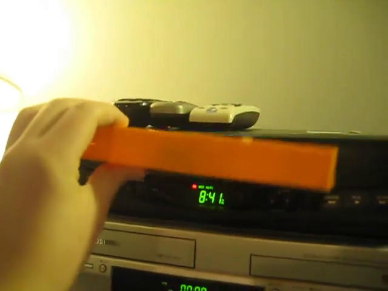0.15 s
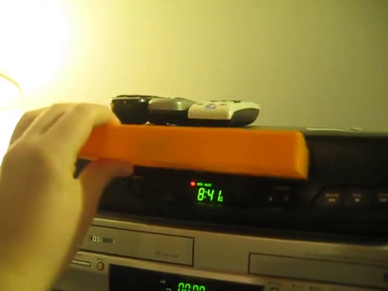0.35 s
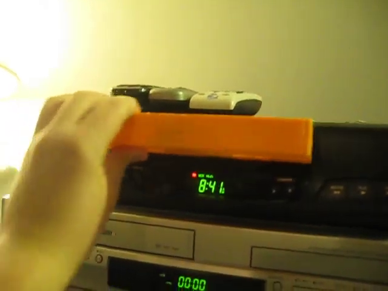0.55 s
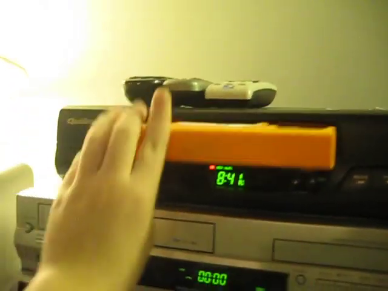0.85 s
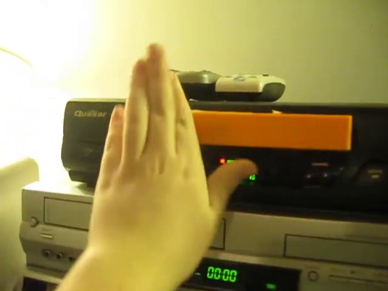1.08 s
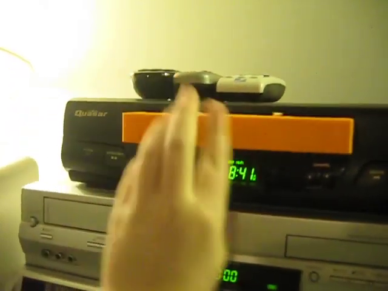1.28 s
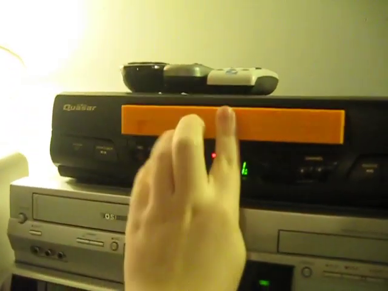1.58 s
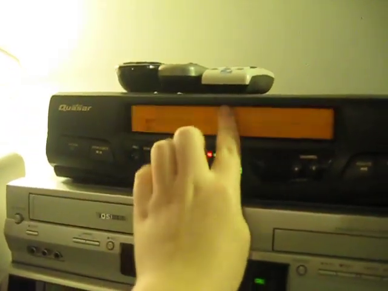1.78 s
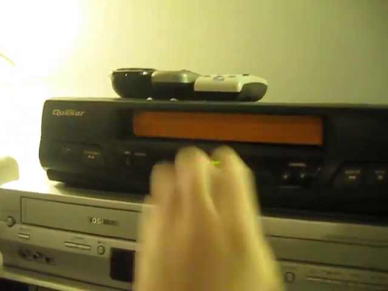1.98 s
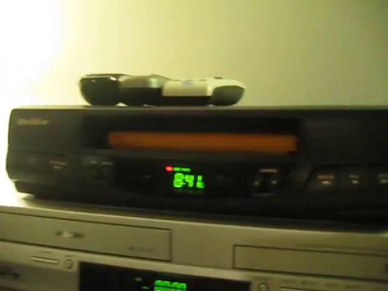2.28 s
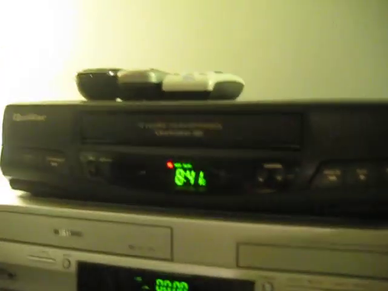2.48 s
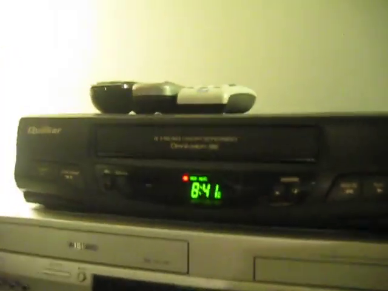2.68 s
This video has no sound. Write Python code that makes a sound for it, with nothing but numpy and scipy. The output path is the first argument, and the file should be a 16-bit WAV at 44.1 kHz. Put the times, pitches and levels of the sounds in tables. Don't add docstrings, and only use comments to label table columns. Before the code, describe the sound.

Video cassette insertion, heard close in a small room: hard hollow plastic clatter first, quieter sliding, then a loader's clunks and springy clicks, with faint hiss and hum on a basic camera microphone.

```python
import sys
import numpy as np
from scipy import signal
from scipy.fft import rfft, irfft
from scipy.io import wavfile
from scipy.ndimage import uniform_filter1d

SR = 44100
rng = np.random.default_rng(int(sys.argv[2]) if len(sys.argv) > 2 else 0)


def invert_db(x):
    u = np.asarray(x, float) / 20
    return 10 ** u


def waveform_to_disk(signal):
    frames = np.transpose(np.atleast_2d(signal))
    scaled = np.clip(frames, -1, 1) * 32767
    samples = np.round(scaled).astype(np.int16)
    wavfile.write(sys.argv[1], SR, samples)


N = 125685
T = np.arange(N) / SR

# (time [s], peak level [dB], box thud re peak [dB], tick pitch [Hz], rattle decay T60 [s])
HAND_KNOCKS = [(.2159, -1, -5, 4560, 0.058), (.3237, 1, -9, 5500, 0.067), (.384, -4.5, -4, 4100, 0.083),
               (.528, -3.5, -1, 2460, 0.041), (.6035, -21, -8, 5230, 0.046),
               (.7387, 1.5, -7.5, 4830, 0.062), (.7587, -2.5, 0.5, 5370, 0.078),
               (.784, 0, -8.5, 4600, 0.086), (.898, -13.5, -15, 5430, 0.11), (.989, -40, -19, 6460, 0.037),
               (1.009, -24.5, -6, 11300, 0.056), (1.1058, -21, -2, 3060, 0.06),
               (1.146, -17.5, -10, 1980, 0.031), (1.271, -21.5, -26, 6600, 0.012),
               (1.576, -18, 4, 4000, 0.026)]
LOADER_KNOCKS = [(1.66, -5, -1.5, 2700, 0.011), (1.816, -11.5, -17, 4000, 0.06),
                 (1.894, -20, 2, 4700, 0.11), (2.098, -7, -6, 4000, 0.12), (2.215, -16, -30, 3170, 0.11),
                 (2.272, -17, -22, 4860, 0.075), (2.3564, -12.5, -6, 2940, 0.07),
                 (2.3805, 1, -17.5, 3040, 0.045), (2.4884, -4, -5.5, 3440, 0.057),
                 (2.5706, -8.5, -0.5, 2890, 0.086), (2.6148, -12.5, -12, 4100, 0.011),
                 (2.678, -28.5, -20, 9500, 0.13), (2.755, -15.5, -11, 1740, 0.063)]
CRACK_DB, CRACK_T60_S = 2, 0.01
RATTLE_DB, THUD_DB, THUD_T60_S = -13, -13.5, 0.099
TICK_DB, TICK_RELATIVE_WIDTH, TICK_TOP_DB = 6, 0.25, -12
HARDNESS_DB_PER_OCTAVE = 18

# (start [s], length [s], box level [dB], shell level [dB], edge level [dB])
FITTING_SCRAPES = [(0.232, 0.046, -23.5, -25.5, -30), (0.354, 0.019, -18, -20.5, -22.5),
                   (0.378, 0.011, -18, -22.5, -24), (0.428, 0.022, -18, -19.5, -17.5),
                   (0.47, 0.029, -22, -25.5, -33), (0.503, 0.028, -19.5, -17.5, -18),
                   (0.54, 0.023, -25.5, -36, -56), (0.565, 0.0081, -34, -31.5, -26.5),
                   (0.605, 0.045, -39.5, -45, -50), (0.655, 0.071, -35.5, -41, -42),
                   (0.765, 0.022, -36, -18, -23.5), (0.79, 0.016, -23.5, -29, -21.5),
                   (0.82, 0.072, -31, -42.5, -50), (0.855, 0.038, -40, -39, -39),
                   (0.89, 0.071, -22.5, -32, -30), (0.952, 0.022, -24.5, -30, -34.5),
                   (0.99, 0.053, -38, -43.5, -52), (1.06, 0.066, -41, -50, -53),
                   (1.108, 0.035, -30.5, -38, -51), (1.146, 0.0081, -22.5, -36, -43.5)]
PUSHING_SCRAPES = [(1.33, 0.025, -31.5, -38, -38.5), (1.39, 0.054, -31.5, -44, -43.5),
                   (1.415, 0.07, -33, -41, -38.5), (1.5, 0.022, -33, -33, -42.5),
                   (1.518, 0.037, -31, -40, -36), (1.58, 0.04, -38.5, -38, -35),
                   (1.651, 0.021, -27, -19.5, -22), (1.678, 0.011, -19, -24, -32),
                   (1.692, 0.0068, -24, -21, -27), (1.748, 0.025, -29.5, -30, -32.5),
                   (1.817, 0.035, -26.5, -30, -36.5), (1.893, 0.042, -34, -34.5, -43),
                   (1.955, 0.025, -30, -41, -37.5), (1.99, 0.031, -33, -33, -39)]
PULLING_SCRAPES = [(2.067, 0.015, -33, -31.5, -33), (2.095, 0.022, -26, -13.5, -20),
                   (2.13, 0.039, -33, -53, -43), (2.215, 0.049, -32.5, -38.5, -41.5),
                   (2.3, 0.065, -33, -32.5, -38.5), (2.357, 0.016, -22, -20.5, -26),
                   (2.386, 0.025, -21, -20, -27.5), (2.42, 0.05, -31, -38, -45),
                   (2.495, 0.025, -23, -24.5, -35), (2.576, 0.027, -34, -32, -53),
                   (2.665, 0.025, -39, -45, -46.5)]
# (start [s], length [s], box level [dB], shell level [dB], edge level [dB])
SWELLS = [
    (0.713, 0.024, -30, -31, -29.5),
    (1.612, 0.043, -29.5, -30, -29),
    (1.792, 0.022, -28.5, -33, -33.5),
    (2.26, 0.014, -21.5, -21.5, -24),
]
SLIPS_PER_S, SLIP_SCATTER_DB, SLIP_WAVER_DB = 5000, 2.5, 2
SHARED_GRIT = 0.62
RISE_SHARE, SWELL_RISE_SHARE = 0.16, 0.78
SAG_DB, RELEASE_S = -2, 0.083

# (centre [Hz], width [Hz], level [dB])
BOX = [(412, 23.3, 0.5), (706, 78, -3.5), (768, 88, -2.5), (849, 65, 0), (1033, 227, -5.5), (1228, 117, 0),
       (529, 126, -9.5), (312, 195, -13), (197.5, 38, -16.5)]
SHELL = [(1620, 240, 1), (2170, 304, 1), (2486, 192, 1), (2800, 307, -0.5), (3420, 290, -4.5)]
EDGE = [(3650, 360, -4.5), (4360, 240, -1), (4754, 400, -2), (5500, 540, -2), (6436, 770, -6),
        (9320, 1500, -12.5), (11250, 1920, -11.5), (13400, 2900, -20.5)]
PARTS = 3
PATCHY_DB, PATCHY_PER_S = 1.8, 45
SHELL_TOP_HZ, BOX_BOTTOM_HZ = 4500, 85

# (time [s], peak level [dB], pitch [Hz], decay T60 [s])
CLICKS = [(0.2169, -8, 3450, .07), (.272, -17, 2420, 0.053), (0.384, -14.5, 11300, 0.08),
          (.5266, -20, 11400, .06), (.567, -36, 11100, 0.13), (0.862, -29, 10500, 0.044),
          (0.953, -28, 5160, 0.049), (1.3286, -35, 4560, 0.046), (1.337, -30, 5800, .04),
          (1.3477, -31, 2800, 0.089), (1.5004, -29, 2300, 0.031), (1.5353, -38, 10930, 0.13),
          (1.652, -15.5, 10200, 0.09), (1.667, -20, 13000, 0.066), (1.682, -23, 3380, 0.036),
          (1.6939, -15.5, 4500, 0.048), (1.803, -33, 10800, 0.055), (1.9018, -19.5, 2530, 0.044),
          (1.962, -21.5, 1670, 0.043), (1.98, -15, 1750, 0.042), (1.9792, -15, 2820, .03),
          (1.9788, -29, 11200, .03), (2.0117, -30.5, 11500, 0.083), (2.015, -24.5, 3540, 0.046),
          (2.109, -25, 11200, 0.033), (2.11, -4.5, 4990, 0.043), (2.153, -23, 4000, 0.041),
          (2.227, -26, 3500, 0.036), (1.754, -21, 2600, 0.041), (2.3003, -32, 9700, 0.044),
          (2.315, -30, 9300, .04), (2.326, -26, 6300, .05), (2.334, -29, 9500, 0.044),
          (2.402, -15.5, 11400, 0.056), (2.357, -21, 6900, 0.078), (2.382, -11, 7500, 0.056),
          (2.489, -17, 7160, 0.058), (2.571, -23.5, 7260, 0.062), (2.481, -28, 6000, 0.037),
          (2.4904, -16.5, 10000, 0.061), (2.572, -26, 9600, .05), (2.6654, -38.5, 10700, 0.23),
          (2.7361, -33, 3250, 0.06)]
CLICK_RELATIVE_WIDTH, CLICK_ATTACK_S = 0.29, 0.0005

# (time [s], pitch [Hz], level [dB])
HOLLOW = [(.218, 779, -15.5), (0.22, 1184, -22.5), (0.358, 1148, -17), (0.386, 1120, -23),
          (.506, 680, -17.5), (.508, 1219, -18), (.52, 412, -36), (.533, 850, -19), (.741, 1247, -15.5),
          (.761, 815, -19), (0.791, 1280, -21), (.905, 411, -25), (.955, 412, -27.5), (.99, 407, -28),
          (1.036, 416, -29.5), (2.098, 1192, -18.5), (2.1, 2170, -14), (2.49, 539, -24), (2.49, 848, -31)]
HOLLOW_T60_S, HOLLOW_REF_HZ = 0.093, 800

# (centre [Hz], width [Hz], level [dB], stop time [s])
MOTOR_WHINE = [
    (390, 18, -49, 2.72),
]
MOTOR_ON_S, MOTOR_SPIN_UP_S = 1.6, 0.11
GEAR_HZ, GEAR_WIDTH_HZ, GEAR_DB = 1400, 1400, -59
DRUM_HZ, DRUM_SAG_HZ_PER_S, DRUM_DB = 1158, 550, -53
DRUM_ENGAGES_S, DRUM_LOAD_S, DRUM_GAIN_DB = 2.782, 0.0046, 8

ROOM_T60_S, ROOM_DB, ROOM_DAMP_HZ = 0.22, -14.5, 4000
# (frequency [Hz], density [dB per Hz])
ROOM_TONE = [(20, -3), (60, -2.5), (250, 3), (700, -18.5), (2100, -6), (7000, -16), (11000, -14),
             (16000, -21)]
ROOM_TONE_DB = -53
# (centre [Hz], width [Hz], level [dB])
HUM = [(460, 53, 10), (1070, 350, -1.5), (1330, 13, 3), (1637, 96, 5.5)]
HUM_DB = -47.5
# (time [s], length [s], level [dB], pitch [Hz])
BUMPS = [
    (0.068, 0.14, -52.5, 30.6),
    (0.737, 0.009, -41, 116),
    (2.365, 0.033, -48, 79),
]

PORT_NOTCH_HZ, PORT_NOTCH_WIDTH_HZ, PORT_LEAK_DB = 7956, 950, -27
TOP_HZ = 15900


def unit(x):
    return x / np.sqrt(np.mean(x ** 2))


def band(x, hz, width):
    return signal.lfilter(*signal.iirpeak(hz, hz / width, fs=SR), x)


def walk(rate):
    hold = int(SR / rate)
    steps = np.repeat(rng.standard_normal(N // hold + 1), hold)
    smooth = uniform_filter1d(uniform_filter1d(steps, hold), hold)
    return unit(smooth[:N])


def knocks():
    force, ticks = np.zeros((PARTS, N)), np.zeros(N)
    age = T[:SR // 20]
    for start, db, thud_db, hz, t60 in list(HAND_KNOCKS) + list(LOADER_KNOCKS):
        i = int(start * SR)
        span = slice(i, i + len(age))
        noise = rng.standard_normal(len(age))
        fade = invert_db(-60 * age / max(t60, 0.01)) + invert_db(CRACK_DB - 60 * age / CRACK_T60_S)
        rattle = noise * fade * invert_db(db + RATTLE_DB)
        hard_db = HARDNESS_DB_PER_OCTAVE * np.log2(hz / 3700) / 2
        force[0, span] += noise * invert_db(db + thud_db + THUD_DB - 60 * age / THUD_T60_S)
        force[1, span] += rattle * invert_db(-hard_db - abs(hard_db))
        force[2, span] += rattle * invert_db(hard_db - abs(hard_db))
        tick = band(band(rattle, hz, TICK_RELATIVE_WIDTH * hz), hz, hz)
        ticks[span] += invert_db(TICK_DB) * tick
    return force, ticks


def slips():
    shape = (PARTS + 1, N)
    size = invert_db(SLIP_SCATTER_DB * rng.exponential(size=shape)) * rng.standard_normal(shape)
    hits = size * np.clip(SLIPS_PER_S / SR - rng.random(shape), 0, 0.02)
    waver = np.array([invert_db(SLIP_WAVER_DB * walk(120)) for _ in range(PARTS)])
    return unit((hits[1:] + SHARED_GRIT * hits[0]) * waver)


def stroke(start, length, rise_share=RISE_SHARE):
    rise = np.clip((T - start) / (rise_share * length), 0, 1)
    sag_db = SAG_DB * np.clip((T - start) / length, 0, 1)
    release_db = -60 * np.clip(T - start - length, 0, None) / RELEASE_S
    return rise * invert_db(sag_db + release_db)


def scrapes():
    force = np.zeros((PARTS, N))
    strokes = list(FITTING_SCRAPES) + list(PUSHING_SCRAPES) + list(PULLING_SCRAPES)
    for start, length, *part_db in strokes:
        force += stroke(start, length) * invert_db(part_db)[:, None]
    for start, length, *part_db in SWELLS:
        force += stroke(start, length, SWELL_RISE_SHARE) * invert_db(part_db)[:, None]
    return force * slips()


def ring(x, modes):
    norm = np.sqrt(sum(invert_db(db) ** 2 * width for _, width, db in modes) * np.pi / SR)
    out = np.zeros(N)
    for k, (hz, width, db) in enumerate(modes):
        excitation = x * invert_db(db + PATCHY_DB * walk(PATCHY_PER_S))
        out += (-1) ** k * band(excitation, hz, width)
    return out / norm


def hollow():
    out = np.zeros(N)
    for start, hz, db in HOLLOW:
        age = T - start
        t60 = HOLLOW_T60_S * np.sqrt(HOLLOW_REF_HZ / hz)
        out += invert_db(db - 60 * np.abs(age) / t60) * np.sin(2 * np.pi * hz * age) * (age > 0)
    return out


def clicks():
    out, age = np.zeros(N), T[:SR // 20]
    attack = np.clip(age / CLICK_ATTACK_S, 0, 1)
    for start, db, hz, t60 in CLICKS:
        i, width = int(start * SR), CLICK_RELATIVE_WIDTH * hz
        burst = rng.standard_normal(len(age))
        burst = unit(band(band(burst, hz, width), hz, width))
        fade = invert_db(db - 6 - 60 * age / max(t60, 0.01))
        out[i:i + len(age)] += burst * fade * attack
    return out


def cassette():
    force, ticks = knocks()
    force = force + scrapes()
    out = ring(force[0], BOX) + ring(force[2], EDGE) + hollow() + clicks()
    shell = ring(force[1], SHELL) + ticks
    out += signal.lfilter(*signal.butter(2, SHELL_TOP_HZ, fs=SR), shell)
    out += invert_db(TICK_TOP_DB) * ticks
    return signal.lfilter(*signal.butter(2, BOX_BOTTOM_HZ, "high", fs=SR), out)


def motor():
    on = np.clip((T - MOTOR_ON_S) / MOTOR_SPIN_UP_S, 0, 1)
    whine = np.zeros(N)
    for hz, width, db, stop in MOTOR_WHINE:
        whine += invert_db(db) * unit(band(rng.standard_normal(N) * (T < stop), hz, width))
    grind = unit(band(rng.standard_normal(N), GEAR_HZ, GEAR_WIDTH_HZ))
    gears = invert_db(GEAR_DB + 2 * walk(29.0)) * grind
    sag_hz = DRUM_SAG_HZ_PER_S * np.clip(T - DRUM_ENGAGES_S, 0, None)
    drum_hz = DRUM_HZ - sag_hz + 6 * walk(44.4)
    load_db = DRUM_GAIN_DB * np.clip((T - DRUM_ENGAGES_S) / DRUM_LOAD_S, 0, 1)
    tone = np.sqrt(2) * np.sin(2 * np.pi * np.cumsum(drum_hz) / SR)
    drum = invert_db(DRUM_DB + load_db + walk(54)) * tone
    return on * (whine + gears + drum)


def room(x):
    age = T[:SR // 2]
    tail = signal.lfilter(*signal.butter(1, ROOM_DAMP_HZ, fs=SR), rng.standard_normal(len(age)))
    tail = tail * invert_db(-60 * age / ROOM_T60_S) * (age > 0.003)
    tail = tail / np.sqrt(np.sum(tail ** 2))
    return x + invert_db(ROOM_DB) * signal.fftconvolve(x, tail)[:N]


def handling_bumps():
    out = np.zeros(N)
    for start, length, db, hz in BUMPS:
        low = unit(band(band(rng.standard_normal(N), hz, hz), hz, hz))
        out += invert_db(db) * stroke(start, length) * low
    return out


def room_tone():
    hz = np.fft.rfftfreq(N, 1 / SR) + 1
    shape_hz, shape_db = np.array(ROOM_TONE).T
    shape = invert_db(np.interp(np.log(hz), np.log(shape_hz), shape_db))
    hiss = unit(irfft(rfft(rng.standard_normal(N)) * shape, N)) * invert_db(ROOM_TONE_DB + walk(18))
    hum = invert_db(HUM_DB + 0.5 * walk(21)) * ring(rng.standard_normal(N), HUM)
    return hiss + hum + handling_bumps()


def scene():
    return (room(cassette() + motor()) + room_tone())[None]


def low_pass(x):
    return signal.sosfilt(signal.butter(12, 16490, fs=SR, output="sos"), x)


def record(dry):
    notch_depth = 1 - invert_db(PORT_LEAK_DB)
    x = dry - notch_depth * band(dry, PORT_NOTCH_HZ, PORT_NOTCH_WIDTH_HZ)
    x = signal.sosfilt(signal.ellip(8, 0.2, 50, TOP_HZ, fs=SR, output="sos"), x)
    mix = np.clip(x, -1, 1)
    return low_pass(mix)


dry = scene()
out = record(dry)
waveform_to_disk(out)
```